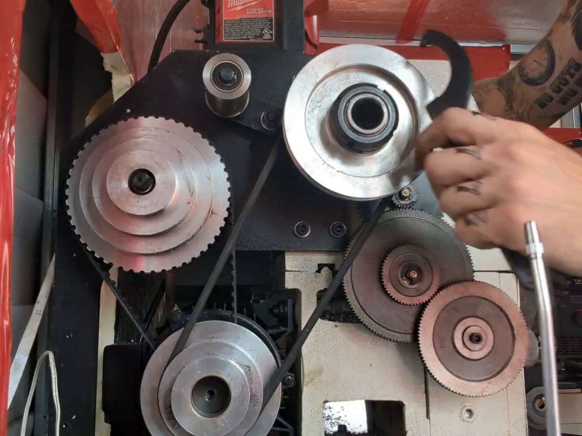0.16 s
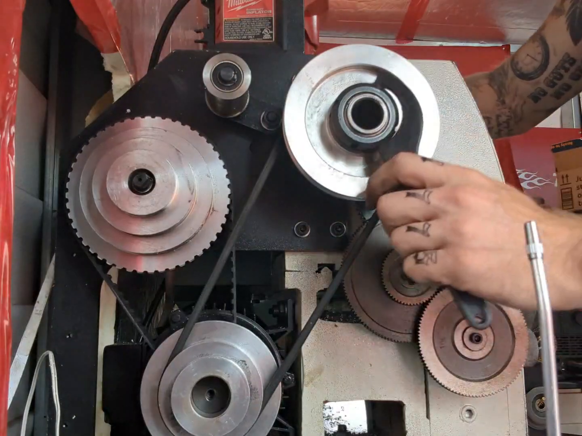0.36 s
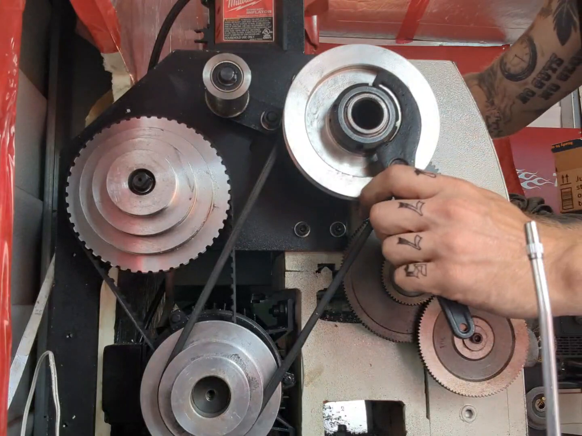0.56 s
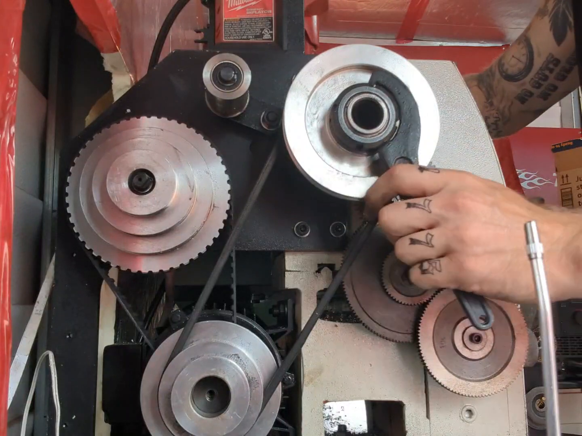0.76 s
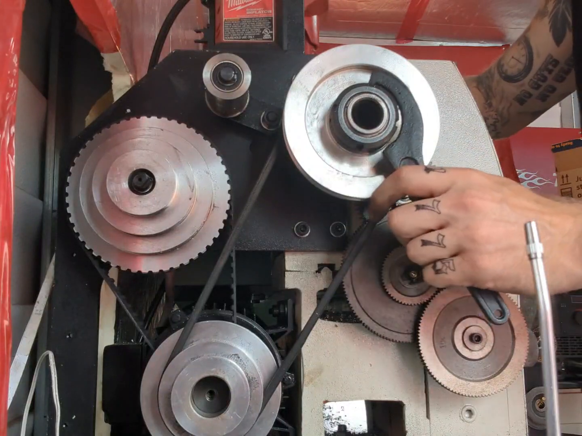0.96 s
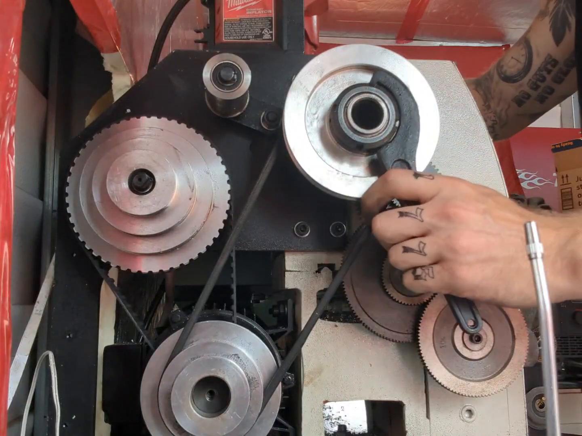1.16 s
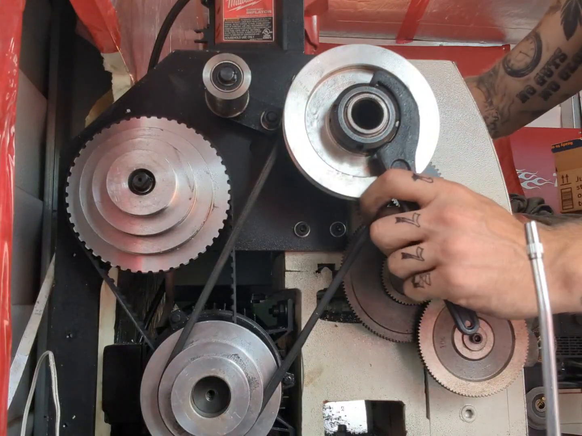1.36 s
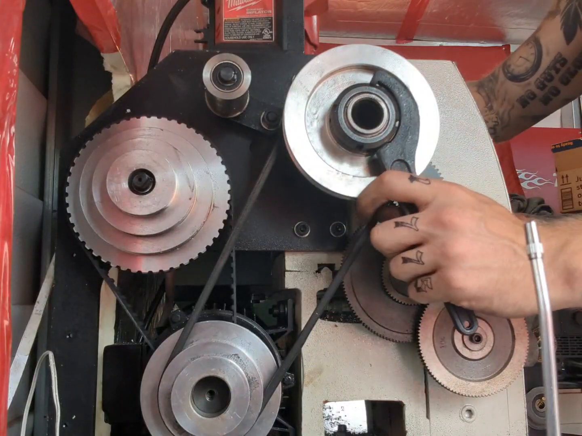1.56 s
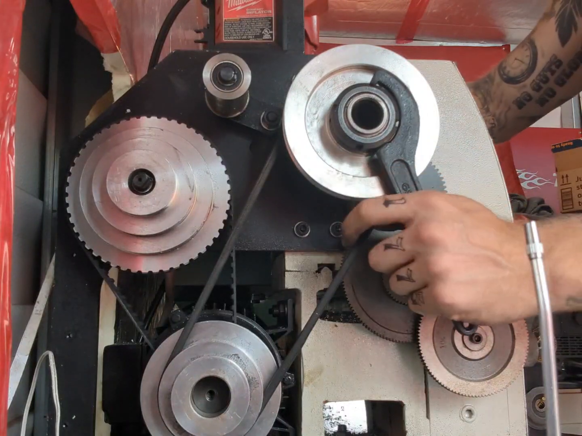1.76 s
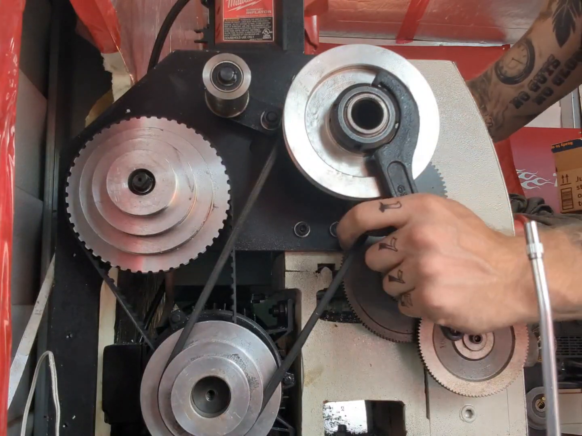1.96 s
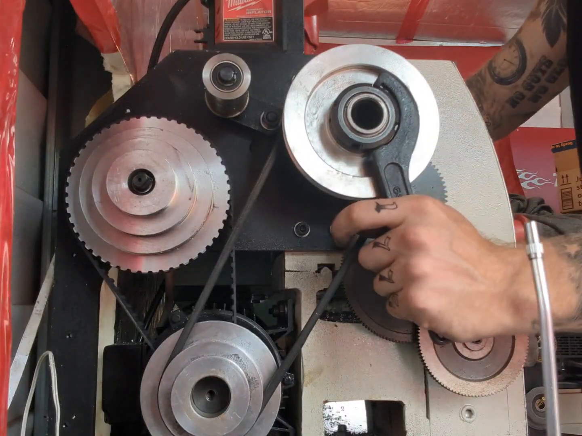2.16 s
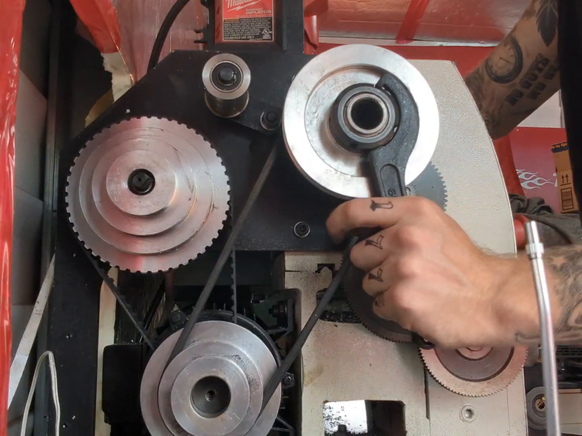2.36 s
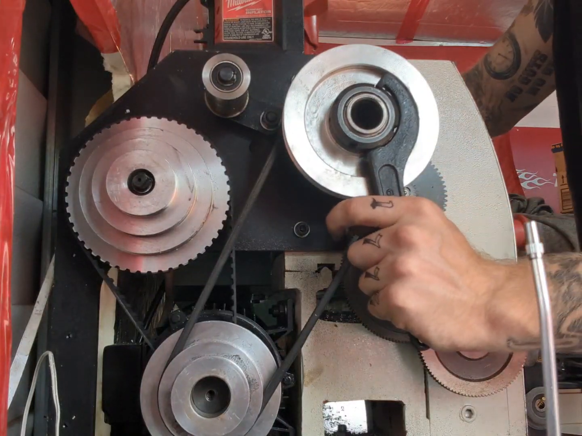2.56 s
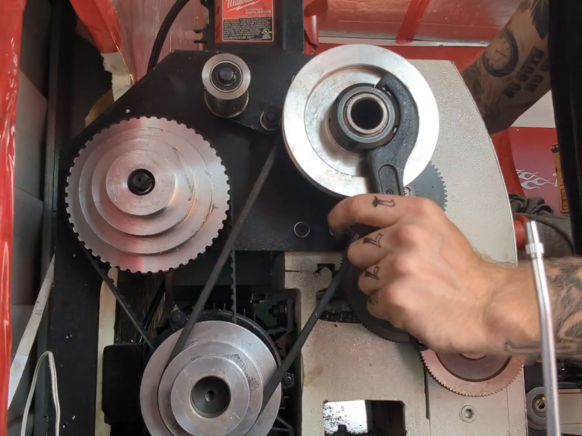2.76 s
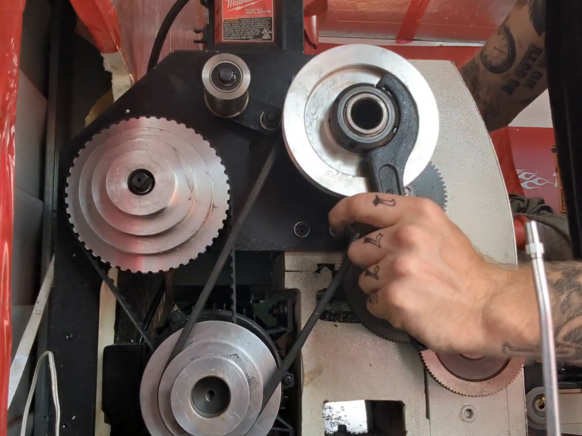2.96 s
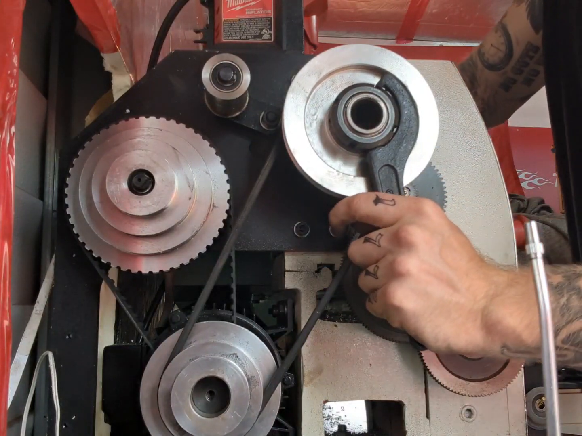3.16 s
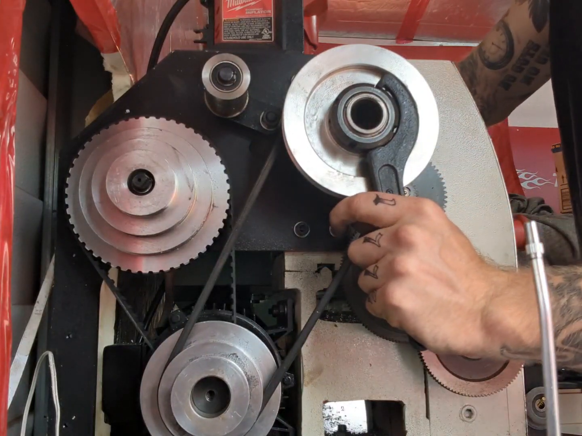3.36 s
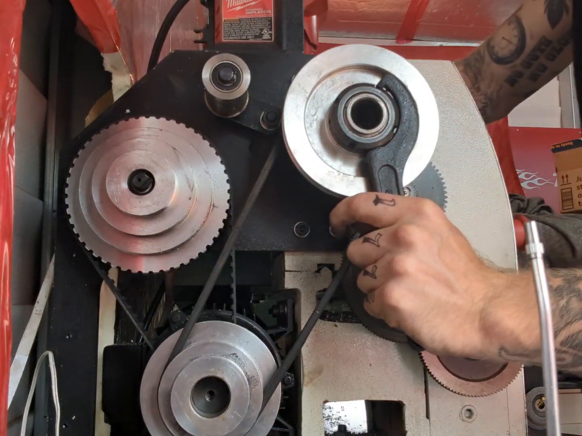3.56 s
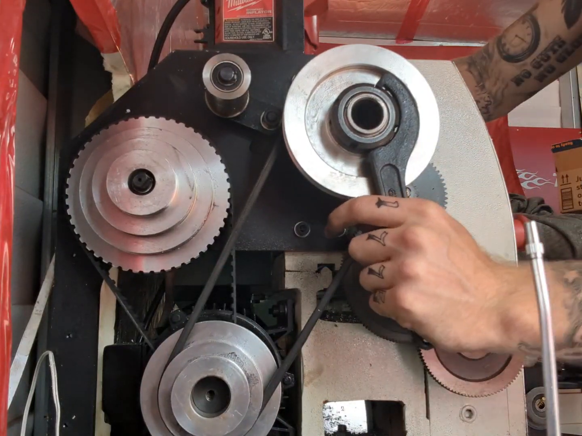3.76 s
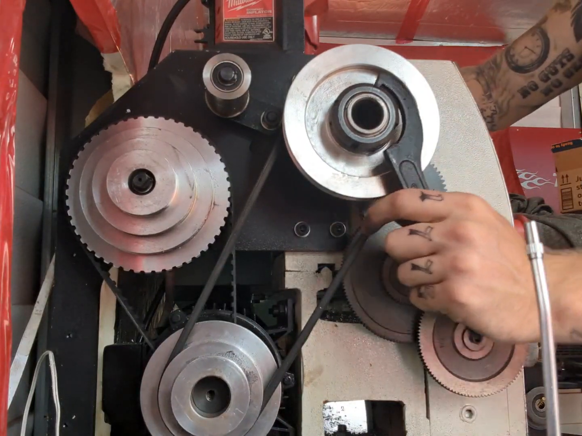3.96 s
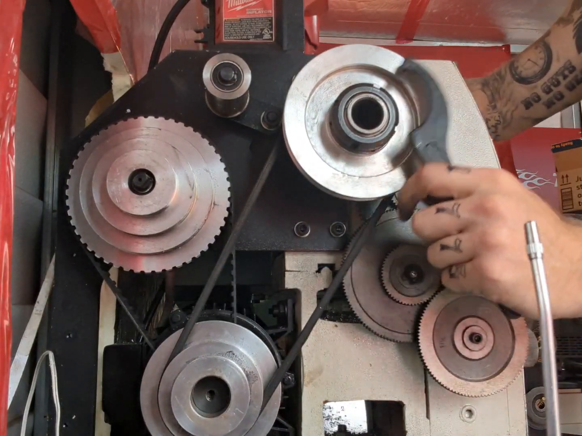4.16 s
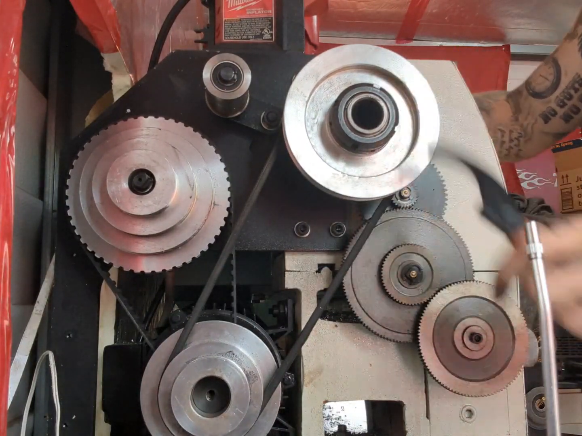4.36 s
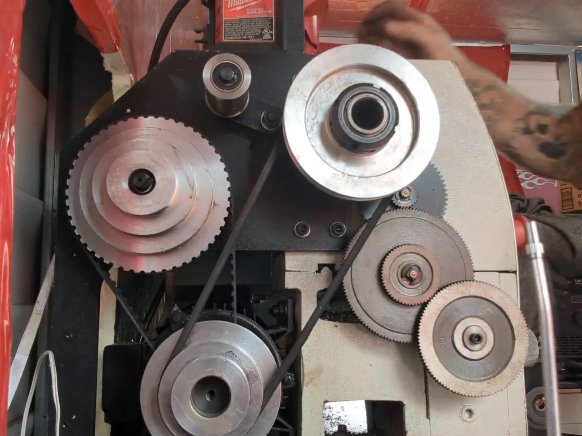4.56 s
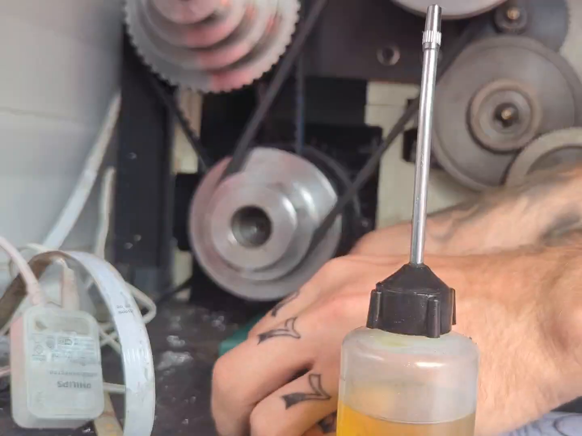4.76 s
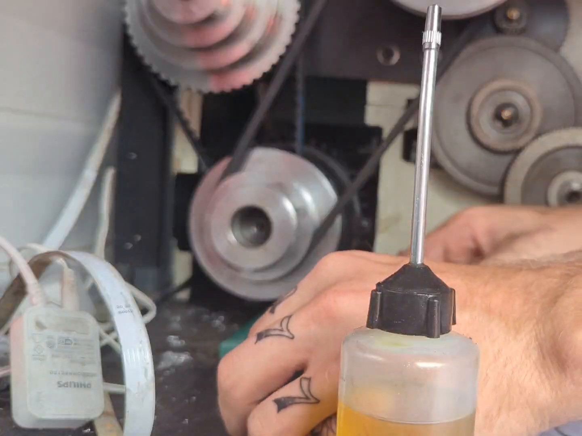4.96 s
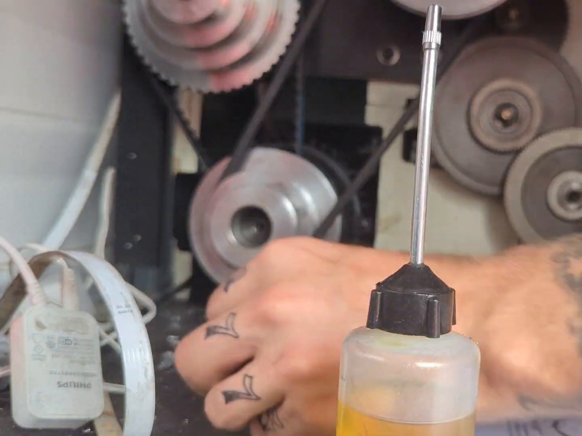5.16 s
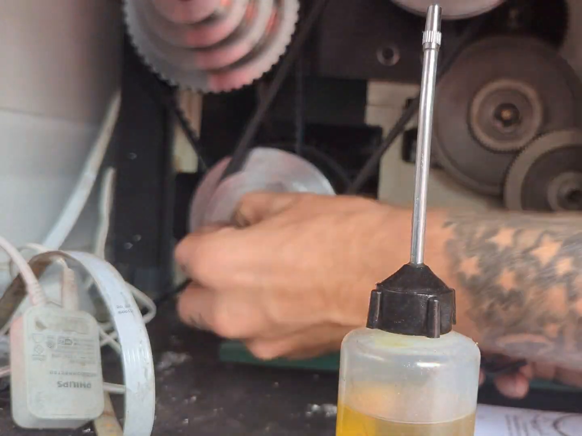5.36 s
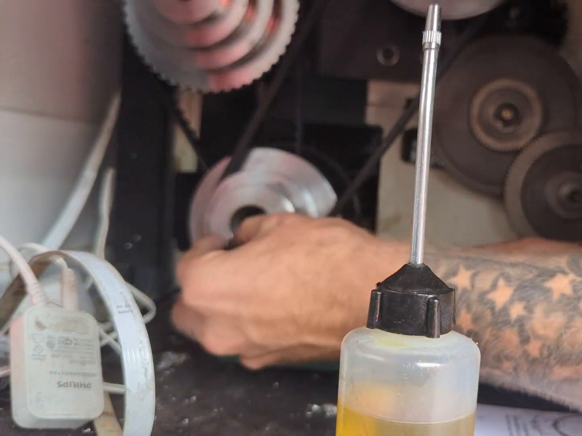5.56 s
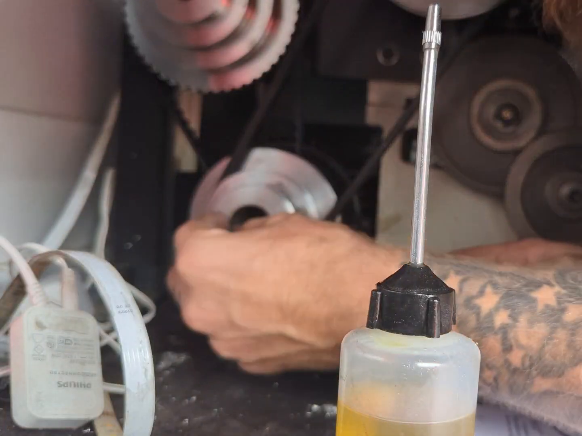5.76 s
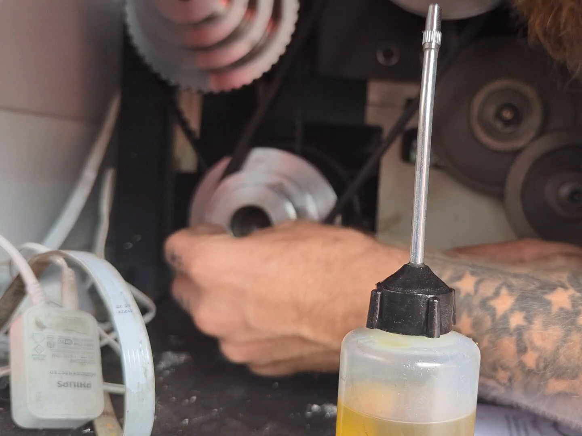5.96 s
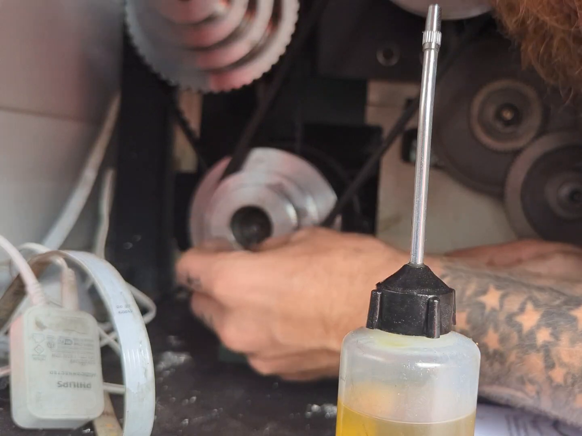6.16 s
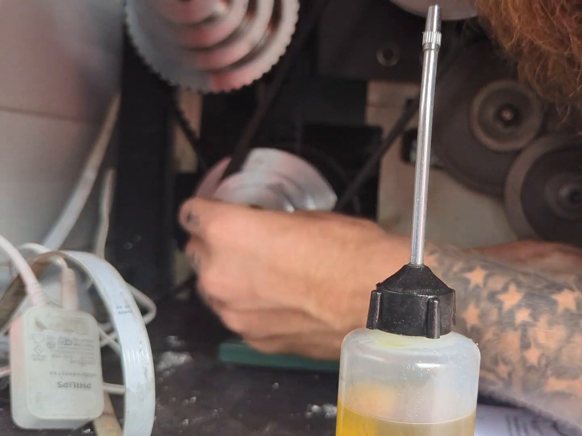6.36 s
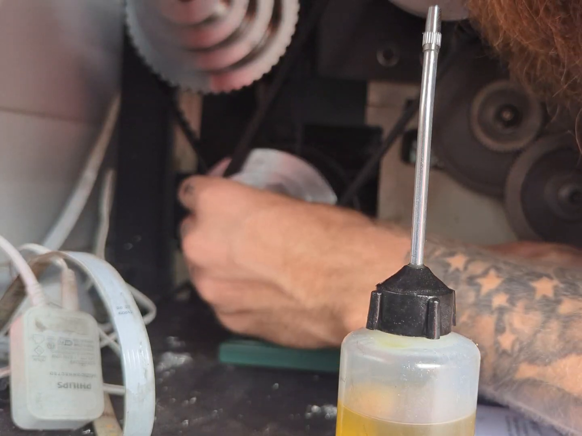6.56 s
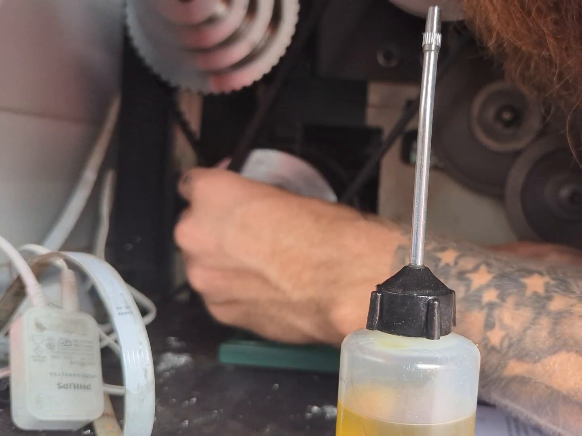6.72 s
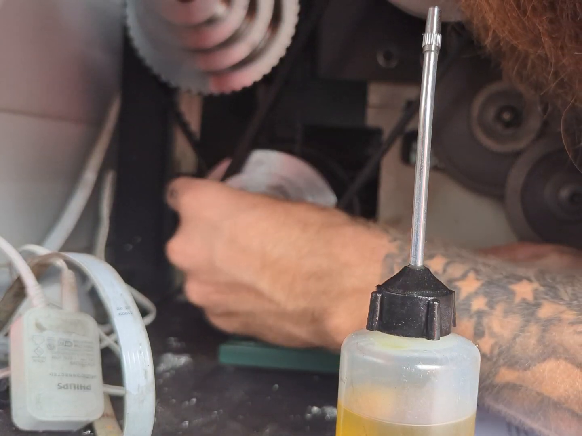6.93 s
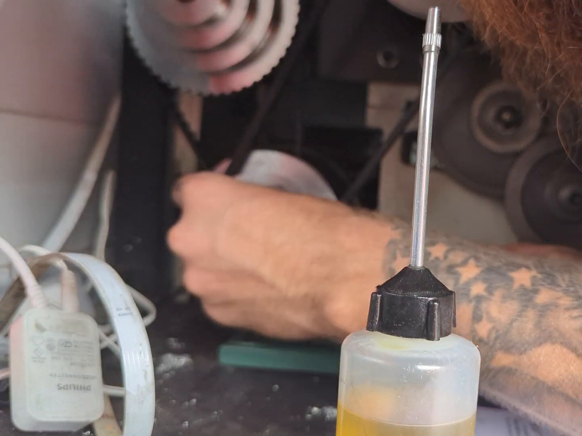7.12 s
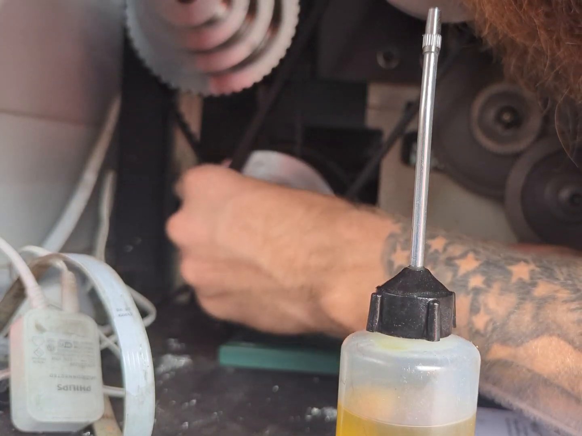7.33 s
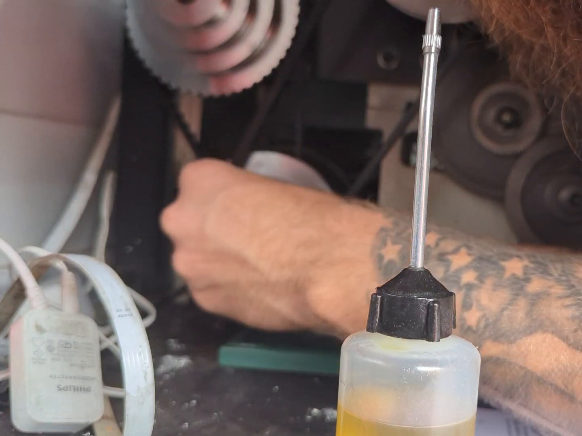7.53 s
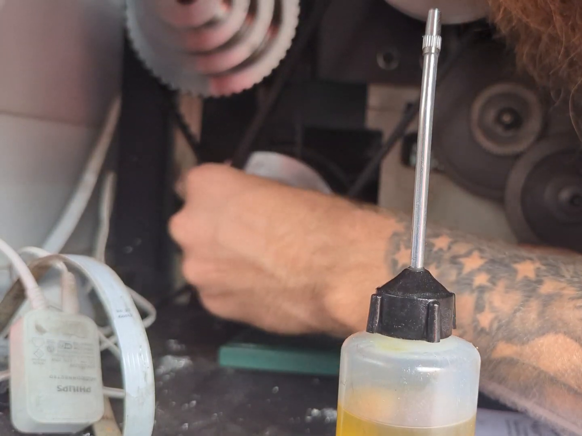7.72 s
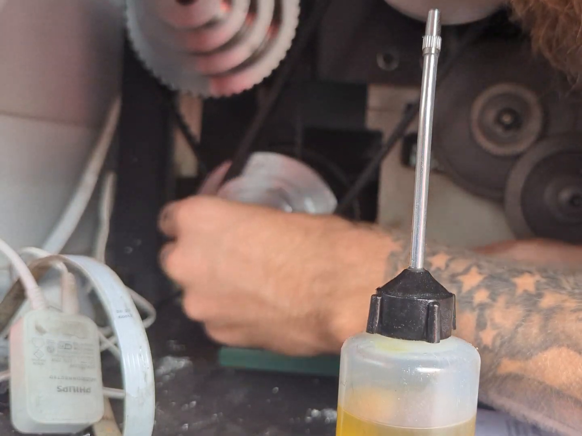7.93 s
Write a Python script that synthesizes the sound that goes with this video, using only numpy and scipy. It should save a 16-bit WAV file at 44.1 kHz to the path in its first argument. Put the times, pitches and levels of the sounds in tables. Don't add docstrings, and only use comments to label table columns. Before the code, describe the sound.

Spanner clatter on iron, piercing brake whistles over traffic rumble, a few lifting knocks, then a hard microphone blow and quiet fiddling with parts.

```python
import sys
import numpy as np
from scipy import signal
from scipy.io import wavfile
from scipy.ndimage import uniform_filter1d

SR = 44100
rng = np.random.default_rng(int(sys.argv[2]) if len(sys.argv) > 2 else 0)


def attenuation_scalar(level_db):
    decades = np.asarray(level_db, float) / 20
    return 10 ** decades


def unload_audio(sound):
    columns = np.transpose(np.atleast_2d(sound))
    steps = np.round(np.clip(columns, -1, 1) * 32767)
    wavfile.write(sys.argv[1], SR, steps.astype(np.int16))


N = 352359

# (time [s], level [dB])
TRAFFIC_LEVEL = [(0, -44), (.27, -43), (.6, -50), (.95, -42), (1.2, -50), (1.44, -46.5), (2.07, -51.5),
                 (2.34, -42.5), (2.55, -45.5), (2.67, -38), (2.95, -47.5), (3.6, -47.5), (3.9, -51),
                 (4.76, -53), (5.6, -58), (6.5, -61), (7.2, -58.5), (7.99, -58)]
# (time [s], gain [dB])
WASH_HISS_GAIN = [(0, 3), (1, -0.5), (2.6, 0), (3.4, -3), (4.35, 0.5), (4.8, 1), (5.1, -4.5), (5.45, -3.5),
                  (5.75, -11), (7.99, -10)]
# (frequency [Hz], level [dB per Hz])
RUMBLE_COLOUR = [(19, -42), (32, -17), (47, -3), (76, 8), (92, 0.5), (113, -9.5), (260, -36.5), (340, -52),
                 (570, -120)]
WASH_COLOUR = [(90, -29), (140, -4.5), (205, -11), (300, -9.5), (700, -17), (860, -22), (980, -18),
               (1570, -24.5), (1870, -22), (2060, -25), (2300, -24), (2700, -28.5), (3600, -29.5),
               (3900, -49)]
HISS_COLOUR = [(2500, -30), (3600, -1), (6500, -3), (8000, -3), (12600, -5), (15600, -5), (15900, -40)]
# (frequency [Hz], level [dB])
HUM_TONES = [(1825, -93.5), (2239, -87.5)]
# (frequency [Hz], likeness [0 to 1])
LIKENESS = [(60, 1), (180, 1), (550, .6), (1650, 0.6), (4970, 0.14), (15000, 0.29)]

# (time [s], level [dB], bass level [dB], treble level [dB], time to fall 60 dB [s])
SLIDES = [(0.0973, -55, -65, -63, 0.1), (0.8258, -29, -33, -31, 0.34), (2.3316, -56.5, -56, -65, 1),
          (2.5358, -45, -72, -51, 0.1), (2.6319, -51, -46, -50, 0.24), (3.1624, -54.5, -59.5, -53, 0.32),
          (3.4336, -40.5, -41.5, -40.5, 0.26), (4.2603, -63, -60, -57, 0.09),
          (4.8027, -31.5, -43, -39, 0.14), (4.975, -49, -46, -62, 0.21), (5.188, -44, -44, -48, 0.093),
          (5.235, -63, -66, -61, 0.35), (5.298, -60, -62, -49, 0.17), (5.362, -51, -50, -49.5, 0.12),
          (5.47, -56.5, -61, -69, 0.54), (6.111, -46.5, -51, -58, 0.17), (6.1292, -49.5, -60, -49.5, 0.089),
          (7.0045, -58.5, -62.5, -61.5, 0.1), (7.185, -59, -59, -82, 0.26), (7.2173, -59, -75.5, -82, 0.18),
          (7.8565, -60.5, -63.5, -75.5, 0.15)]
# (time [s], level [dB], pitch of the part [Hz], bass level [dB], treble level [dB])
SPINDLE_TICKS = [
    (0.3944, -66, 1240, -48, -77),
    (1.84, -72, 5950, -76, -62),
    (2.497, -56, 3150, -69, -60),
    (3.4165, -61, 7440, -58, -55),
    (3.7861, -60, 2500, -69, -64),
    (4.249, -62, 3300, -70, -65),
    (3.8987, -72, 910, -77, -70.5),
    (4.0594, -68, 927, -71, -58),
    (4.149, -72, 1000, -72, -59.5),
]
# (time [s], level [dB],
# pitch of the part [Hz], bass level [dB], treble level [dB])
SHORT_KNOCKS = [(3.948, -49, 1450, -70, -57), (3.9913, -46, 1450, -70, -44.5),
                (4.7803, -44, 1070, -33, -73), (4.807, -31, 1720, -50, -31.5),
                (4.815, -30, 1970, -44, -42), (4.8682, -43.5, 1080, -34.5, -70),
                (5.0355, -62, 5500, -43.5, -42.5), (5.1329, -73.5, 980, -40.5, -94),
                (5.1652, -47, 1010, -41, -61), (5.1835, -50, 900, -46, -59),
                (5.194, -40.5, 1030, -44, -60), (5.2823, -40, 2980, -46, -57),
                (5.6527, -59, 1100, -63.5, -84.5), (6.2081, -60, 3070, -63.5, -77),
                (6.2406, -57.5, 3150, -60, -89), (6.4898, -76, 2234, -76, -83),
                (6.6372, -61, 1870, -69.5, -85.5), (6.782, -53, 1837, -59.5, -78),
                (6.985, -56, 1740, -65, -58), (6.989, -70, 1100, -66, -45), (7.006, -57, 6500, -65, -56),
                (7.5467, -49, 1400, -70, -52)]
# (frequency [Hz], width [Hz], level [dB])
ANSWERING_PARTS = [(1500, 300, -1.5), (1746, 270, 1), (2120, 370, 1), (2720, 180, -13), (3150, 200, -6)]
# (time [s],
# level [dB], pitch [Hz])
FINGER_BUMPS = [(5.616, -61, 611), (5.689, -64.5, 674), (5.779, -65, 665), (5.881, -75, 692),
                (5.979, -67, 630), (6.1, -63.5, 730), (6.235, -70, 660), (6.321, -83, 635),
                (6.496, -77, 546), (6.785, -73.5, 722), (6.99, -60, 696), (7.172, -63, 710),
                (7.549, -64, 750), (7.666, -69, 704), (7.796, -68.5, 732), (7.865, -69, 590),
                (1.2, -46.5, 298), (3.44, -53.5, 360), (4.0, -50.5, 282), (4.15, -56.5, 240),
                (4.25, -53, 220), (7.0, -54.5, 202), (7.56, -58.5, 296), (7.869, -60, 327), (6.5, -66, 300)]

# (time at full
# voice [s], hold [s], level [dB], pitch [Hz], time to fall 60 dB [s])
BRAKE_SQUEALS = [(0.151, 0.013, -67.5, 8580, .4), (0.634, 0.025, -50.5, 8620, 0.052),
                 (0.687, .002, -57, 8580, 0.14), (0.735, 0.075, -62.5, 6526, .03),
                 (0.805, 0.012, -69, 8600, .05), (1.005, .02, -66, 8620, .3),
                 (1.235, 0.067, -48.5, 8624, 0.12), (1.342, .002, -66, 8580, 0.56),
                 (1.613, 0.027, -35, 8510, 0.047), (1.626, .002, -56.5, 7570, .08),
                 (1.678, 0.051, -36.5, 8500, 0.35), (1.785, 0.081, -38, 8480, 0.2),
                 (1.895, 0.085, -34.5, 8464, 0.13), (1.988, 0.078, -47, 8460, 0.11),
                 (2.111, 0.023, -56, 8460, 0.11), (2.191, 0.48, -80.5, 8440, .1),
                 (3.607, 0.044, -78.5, 3530, .06), (4.279, 0.073, -73, 3490, .2),
                 (6.128, 0.01, -62, 5560, 0.091), (0.837, 0.065, -53, 2000, .05),
                 (4.277, 0.065, -77, 2610, .1), (4.319, 0.091, -61.5, 288.3, 0.11),
                 (4.35, 0.3, -68, 440, .1)]
# (time [s], pitch [Hz], level [dB])
ENGINE_NOTE = [(0.7, 76, -70), (0.87, 71, -50), (1.36, 65.43, -46.5), (2.32, 60.9, -46),
               (2.69, 62.8, -54.5), (3.07, 59.57, -51.5), (3.3, 60.74, -57.5), (3.5, 55.3, -47.5),
               (3.8, 56.4, -41)]

# (time [s], casting knock [dB], steel ring [dB], crack [dB], ring time to fall 60 dB [s])
FREE_CONTACTS = [
    (0.499, -18.5, -25, -30, 0.19),
    (0.503, -26, -26, -29, 0.22),
    (0.522, -23, -34.5, -36, 0.19),
    (0.544, -29, -33.5, -33.5, 0.097),
    (0.572, -24.5, -29, -47.5, 0.078),
    (0.592, -29, -46, -58, 0.26),
    (0.662, -27, -56, -46, 0.092),
    (0.697, -29, -43.5, -55, 0.054),
]
# (favoured pitch [Hz], fall on either side [dB per octave])
FREE_FAVOURED = [(4700, 3), (3600, 3), (5000, 8.5), (7810, 12), (4560, 7.5), (5500, 4.5), (3700, 22),
                 (4150, 12)]
# (time [s], casting knock [dB], steel ring [dB], crack [dB])
HELD_CONTACTS = [
    (0.899, -26, -46, -28.5),
    (0.929, -29.5, -63, -43),
    (0.984, -32, -68.5, -52),
    (1.088, -39.5, -80, -82),
    (1.19, -33, -66, -42.5),
    (3.856, -55.5, -83, -64.5),
    (3.951, -31, -58.5, -42),
    (3.994, -30, -62, -40),
    (4.031, -44, -96, -74),
    (4.262, -45, -82, -63),
]
STEEL_MODES_HZ = [2266, 3009, 3630, 4735, 5400, 6002, 6745, 7318, 8590, 9615, 11765, 12350, 13465]
# (level [dB], share of the ring time)
STEEL_VOICE = [(-3.5, 1.1), (-12.5, 0.26), (-7.5, 1.11), (0, 0.75), (-16, 0.67), (-10, 0.97), (-7, 1.1),
               (-10.5, 2.1), (-8.5, 0.83), (-15.5, 0.23), (-14, 0.496), (-19, .6), (-14.5, 1)]
CASTING_MODES_HZ = [215, 281, 355, 441, 580, 628, 682, 792, 878, 925, 1000, 1063, 1185, 1300, 1367, 1520,
                    1700, 1980]
# (level [dB], time to fall 60 dB [s])
CASTING_VOICE = [(-17.5, 0.16), (-32.5, 0.13), (-13, 0.12), (-19, 0.15), (-15.5, 0.099), (-10, 0.17),
                 (-11.5, 0.26), (-10.5, 0.24), (-5.5, .11), (-3.5, 0.14), (1, 0.037), (-11, 0.3),
                 (-7, 0.08), (-14, 0.16), (-9, 0.099), (-11, 0.059), (-14.5, 0.078), (-23.5, 0.055)]

# (time [s], level [dB], frequency [Hz], time to fall 60 dB [s])
SINGLE_PINGS = [(0.499, -25, 4760, 0.1), (0.499, -27, 2240, .12), (4.975, -50, 1800, 0.093),
                (4.99, -50, 1860, 0.085), (5.005, -53, 1790, 0.062), (5.283, -52, 1500, .02),
                (3.992, -47, 5300, 0.022), (3.992, -52, 6700, .015), (3.948, -40, 1380, 0.023),
                (3.991, -41, 1400, .025), (3.998, -40, 900, 0.037), (1.188, -37, 1450, .03),
                (1.19, -42.5, 1295, 0.13), (1.192, -52, 2500, 0.064), (1.188, -53, 3750, .02),
                (6.985, -57, 1735, .06), (6.985, -59, 3140, .04), (6.989, -59, 5814, 0.056),
                (6.989, -60, 6600, .03), (6.989, -62, 10400, .03), (7.006, -60, 1703, .03),
                (7.547, -46, 1344, .035), (7.547, -53, 1525, .06), (7.547, -53, 2330, .06),
                (5.1335, -45, 745, .03), (5.184, -33, 860, .035), (5.194, -33, 900, .025),
                (5.199, -34, 1080, .035), (5.282, -44, 422, .018), (4.815, -46.5, 4600, .02),
                (4.816, -30.5, 2100, 0.039), (4.803, -46, 4440, 0.016), (0.899, -52, 4800, .05),
                (1.189, -57, 4830, 0.053), (3.439, -46, 7720, .08), (3.46, -56, 1590, 0.19),
                (4.8065, -36, 4620, .016), (4.8065, -35, 3060, .016), (5.035, -41, 740, 0.031),
                (5.035, -44, 4500, 0.029), (5.035, -44, 5700, .03), (5.035, -52, 8110, .03),
                (5.236, -60, 5600, .03), (5.236, -66, 8200, .03), (5.283, -56, 3040, .03),
                (6.782, -62, 3030, 0.044), (7.547, -48.5, 3170, 0.047), (7.547, -50, 1750, 0.039),
                (7.86, -68, 2450, .08),
                (.57, -30, 3638, .08), (.57, -37, 2263, .04), (.571, -38, 4742, .07),
                  (.57, -42, 7316, .08), (.543, -38, 6749, .06), (.499, -34, 3638, .07),
                  (.522, -30, 580, .09), (.499, -28, 600, .09), (.898, -42, 3400, .025),
                  (.898, -40, 2500, .025), (.898, -48, 6100, .03), (.662, -50, 3638, .09),
                  (3.991, -47, 3625, .1), (3.949, -48, 2450, .06), (3.992, -46, 1800, .05),
                  (3.992, -52, 2800, .06), (7.547, -54, 2690, .03), (5.282, -47, 3300, .013),
                  (5.282, -50, 1400, .013), (.898, -38, 1900, .02), (1.188, -48, 2900, .025),
                  (6.2, -70, 5550, .06), (3.952, -42, 600, .08)]
# (time [s], level [dB], after-swing level [dB])
BLOW = [
    (4.7644, .2, -5.7),
    (4.76422, -.9, -12),
]
# (frequency [Hz], level [dB], time to fall 60 dB [s])
CLACK_MODES = [(651, -5, .1), (791, -3, .07), (1039, -1, .09), (1265, -7, .13), (1560, -8, .05),
               (1432, -13, .1), (1750, -4, .06), (1950, -8, .05), (2148, -8, .08), (2514, -17, .1),
               (3000, -18, .06)]
# (time [s], sliding pitch [Hz], pressure [dB])
DRAG_PATH = [(5.22, 1090, -89), (5.32, 1600, -64), (5.338, 1680, -51), (5.383, 1640, -51),
             (5.395, 1380, -49), (5.47, 1250, -56.5), (5.52, 1096, -64), (5.57, 1127, -77),
             (5.68, 1160, -91)]
TRAY_MODES_HZ = np.array([1130, 1370, 1650])
# (frequency [Hz], time to fall 60 dB [s])
SHOP_DECAY = [(200, .25), (1000, 0.27), (3000, 0.1), (12000, 0.05)]


def evened(x):
    return x / np.sqrt(np.mean(x ** 2) + 1e-20)


def read(points, hz):
    f, value = np.transpose(points)
    return np.interp(np.log(hz + 1), np.log(f + 1), value)


def add(mix, s, sound):
    part = mix[..., round(s * SR):][..., :sound.shape[-1]]
    part += sound[..., :part.shape[-1]]


def columns(rows):
    s, *rest = np.transpose(rows)
    t = np.arange(s[0], s[-1], 1 / SR)
    return s[0], [np.interp(t, s, c) for c in rest]


def resonate(x, hz, width_hz):
    turn = np.exp(2j * np.pi * np.cumsum(hz * np.ones(x.shape[-1])) / SR)
    r = np.exp(-np.pi * width_hz / SR)
    return 2 * (turn * signal.lfilter([1 - r], [1, -r], x / turn + 1e-18)).real


def band(x, lo_hz, hi_hz, order=3):
    sos = signal.butter(order, [lo_hz, min(hi_hz, SR / 2.2)], "band", fs=SR, output="sos")
    return evened(signal.sosfilt(sos, x))


def grain(size, depth_db):
    flicker = uniform_filter1d(uniform_filter1d(rng.standard_normal(size), size=70), size=50)
    return evened(attenuation_scalar(depth_db * evened(flicker)))


def ring(modes, t, scatter_db, turns, beat=0):
    hz, db, t60 = np.transpose(modes)[:, :, None]
    luck, apart = rng.standard_normal((2, len(modes), 1))
    sides = np.array([-.5, .5])[:, None, None]
    phase = rng.random(luck.shape) + turns * apart * sides
    beating = 1 + beat * np.cos(2 * np.pi * (45.4 * apart * t + 7 * phase[0]))
    x = attenuation_scalar(db + scatter_db * luck - 60 * t / t60) * beating * np.sin(2 * np.pi * (hz * t + phase))
    return x.sum(1) / np.sqrt(np.sum(attenuation_scalar(db) ** 2))


def from_right(x):
    return np.array([np.roll(x[0], 18), x[1]])


def background():
    frames, hz = N // 512 + 5, np.fft.rfftfreq(2048, 1 / SR)
    a, b, c, d, patches = rng.standard_normal((frames, 1025, 5)).T
    patches = evened(uniform_filter1d(uniform_filter1d(patches, size=20, axis=0), size=6, axis=1))
    same = np.clip(read(LIKENESS, hz), .3, 1)[:, None]
    left = a + 1j * b
    right = same * left + np.sqrt(1 - same ** 2) * (c + 1j * d)
    z = np.array([left, right]) * attenuation_scalar(1.2 * patches)
    t = np.arange(N) / SR
    gain_db = np.interp(t, *np.transpose(WASH_HISS_GAIN))
    traffic_db = np.interp(t, *np.transpose(TRAFFIC_LEVEL))
    out = sum(attenuation_scalar(db) * np.sqrt(2) * np.sin(2 * np.pi * f * t) for f, db in HUM_TONES) * np.ones((2, 1))
    layers = [(RUMBLE_COLOUR, traffic_db, from_right), (WASH_COLOUR, -59 + gain_db, from_right),
              (HISS_COLOUR, -75 + 1.4 * gain_db, np.array)]
    for colour, db, place in layers:
        layer = signal.istft(z * attenuation_scalar(read(colour, hz))[:, None], nperseg=2048, noverlap=1536)[1][:, :N]
        out = out + place(evened(layer)) * attenuation_scalar(db)
    return out


def handling(rows, rise_s, snap, ring_db, grain_db, edge_hz, top_hz):
    out, t = np.zeros((2, N)), np.arange(SR // 3) / SR
    for s, db, hz, bass_db, treble_db, t60 in rows:
        z = rng.standard_normal((3, len(t)))
        z = (z[0] + 1.4 * z[1:]) * grain(len(t), grain_db)
        parts = evened(sum(attenuation_scalar(p_db) * resonate(resonate(z, f, w), f, w) / np.sqrt(w)
                           for f, w, p_db in ANSWERING_PARTS))
        burst = attenuation_scalar(db - 2.5) * (parts + .88 * band(z, 1000, 3500, order=4))
        burst += attenuation_scalar(treble_db - 20 * t / t60) * band(z, edge_hz, top_hz, order=2)
        burst *= 1 + snap * np.exp(-t / 0.0037)
        burst += attenuation_scalar(bass_db + 12 * t / t60) * band(z, 610, 1500)
        own_db = bass_db if hz < 1300 else db if hz < 4000 else treble_db
        burst += attenuation_scalar(own_db + ring_db - 15 * t / t60) * evened(resonate(resonate(z, hz, 260), hz, 260))
        rise = np.sin(np.pi / 2 * np.minimum(t / rise_s, 1)) ** 2
        add(out, s - rise_s / 2, burst * attenuation_scalar(-7 - 60 * t / t60) * rise)
    return out


def squeal(s, hold, db, hz, t60):
    t = np.arange(-.06, hold + t60, 1 / SR)
    z = rng.standard_normal((2, SR))
    drift = evened(uniform_filter1d(z[0], size=3000))[:len(t)]
    hz = hz - 140 * t
    fuzz = evened(resonate(resonate(z[1, :len(t)], hz, 400), hz, 400))
    tone = np.sqrt(2) * np.sin(2 * np.pi * np.cumsum(hz) / SR + np.outer([1, 0], drift)) + 0.002 * fuzz
    shape_db = 895.5 * np.minimum(t, 0) - 60 * np.maximum(t - hold, 0) / t60
    return s + t[0], attenuation_scalar(db + shape_db) * tone * attenuation_scalar([[-5], [3]])


def vehicle():
    out, note = np.zeros((2, N)), np.zeros((2, N))
    for row in BRAKE_SQUEALS:
        add(out, *squeal(*row))
    s, (hz, db) = columns(ENGINE_NOTE)
    tone = np.sqrt(2) * np.sin(2 * np.pi * np.cumsum(hz) / SR)
    add(note, s, attenuation_scalar(db) * tone * signal.windows.tukey(len(hz), .1))
    return out + from_right(note)


def spanner():
    out, t = np.zeros((2, N)), np.arange(SR // 3) / SR
    long = np.arange(SR // 2) / SR
    casting = [(hz, *row) for hz, row in zip(CASTING_MODES_HZ, CASTING_VOICE)]
    contacts = [(*row, *spot) for row, spot in zip(FREE_CONTACTS, FREE_FAVOURED)]
    # ring time 0.12 s, only modes near the jaw's 3630 Hz
    contacts += [(*row, 0.12, 3630, 38) for row in HELD_CONTACTS]
    next_times = [row[0] for row in contacts[1:]] + [N]
    for (s, knock_db, ring_db, crack_db, t60, spot_hz, narrow_db), later in zip(contacts, next_times):
        knock = ring(casting, t, 1.6, .22, beat=.5) * (.7 + 1.2 * np.exp(-t / .012))
        knock *= np.minimum(t / .003, 1) * grain(len(t), 3.2)
        steel = [(hz, db - narrow_db * abs(np.log2(hz / spot_hz)), share * t60)
                 for hz, (db, share) in zip(STEEL_MODES_HZ, STEEL_VOICE)]
        steel = ring(steel, t, 1.2, .15, beat=.3) * grain(len(t), 1.5)
        z = rng.standard_normal((3, len(t)))
        z = (z[0] + 1.4 * z[1:]) * grain(len(t), 2.2)
        grit = attenuation_scalar(-3 - .27 * narrow_db - 60 * t / .089) * band(z, 2400, 7200, order=2)
        grit *= np.minimum(t / 0.0037, 1)
        stifle = attenuation_scalar(-60 * np.maximum(t - (later - s), 0) / 0.017) * np.minimum(t / 0.00031, 1)
        crack = band(z, 1150, 2400, order=2) * (attenuation_scalar(-60 * t / 0.057) + attenuation_scalar(-60 * t / 0.0027))
        crack += attenuation_scalar(-11 - 60 * t / 0.022) * band(z, 2500, 4400, order=2)
        cover = attenuation_scalar(knock_db - 26 - 60 * long / .74) * np.sin(2 * np.pi * 997 * long) * (1 - 2 * long)
        add(out, s, cover)
        clink = attenuation_scalar(knock_db) * knock + attenuation_scalar(ring_db + 3.5) * (steel + grit) * stifle + attenuation_scalar(crack_db) * crack
        add(out, s - .002, clink)
    return out


def pings():
    out, t = np.zeros((2, N)), np.arange(SR // 5) / SR
    for s, db, hz, t60 in SINGLE_PINGS:
        add(out, s, attenuation_scalar(db) * ring([(hz, 0, t60)], t, 0, .14) * np.minimum(t / .001, 1))
    return out


def bumps():
    out, t = np.zeros((2, N)), np.arange(SR // 8) / SR
    for s, db, hz in FINGER_BUMPS:
        z = rng.standard_normal((3, len(t)))
        hollow = evened(resonate(z[0] + 0.38 * z[1:], hz, 67))
        add(out, s, hollow * attenuation_scalar(db + 1.5 - 60 * t / 0.15) * np.minimum(t / 0.0041, 1))
    return out


def thump():
    s, db, after_db = np.transpose(BLOW)[:, :, None]
    t = np.arange(N) / SR - s
    blow = np.exp(-.5 * ((t - .0003) / .00077) ** 2)
    after = attenuation_scalar(after_db) * np.clip(t / .0012, 0, 1) * np.clip((4.7679 - s - t) / .0004, 0, 1)
    swing = np.cos(2 * np.pi * t * (560 + 24000 * t))
    edge = attenuation_scalar(-38) * band(rng.standard_normal(N), 1400, 4000, order=2)
    edge = edge * np.exp(-.5 * ((t - .0005) / .0015) ** 2)
    return attenuation_scalar(db) * (np.maximum(blow, after) * (swing + 0.021) + edge)


def clack():
    out, t = np.zeros((2, N)), np.arange(SR // 4) / SR
    length_s, tail = .021, .22
    pressed = np.clip((length_s - t) / .004 + 1, 0, 1)
    push = np.minimum(t / .007, 1) ** 2 * (tail + (1 - tail) * pressed)
    held = attenuation_scalar(60 * np.minimum(t, length_s) / .15)
    sound = ring(CLACK_MODES, t, 0, 0.16, beat=.3) * held * push * grain(len(t), 3.5)
    add(out, 4.799, attenuation_scalar(-31.5) * sound / np.sqrt(np.mean(sound[:, :SR // 30] ** 2)))
    return out


def drag():
    out, (s, (hz, tray_db)) = np.zeros((2, N)), columns(DRAG_PATH)
    fade_db = 43 * np.arange(len(hz)) / SR
    rub_db = -61.5 + .1 * (tray_db - tray_db[0]) - fade_db
    z = rng.standard_normal((2, len(hz)))
    z = (z + .5 * z[::-1]) * grain(len(hz), 2.5)
    tray = sum(evened(resonate(resonate(z, f, 250), f, 210)) * np.exp(-((hz - f) / 170) ** 2)
               for f in TRAY_MODES_HZ)
    sound = attenuation_scalar(tray_db - 3.5) * tray + attenuation_scalar(rub_db) * band(z, 640, 3800)
    add(out, s, sound * signal.windows.tukey(len(hz), .2))
    return out


def shop(x):
    taps = np.zeros((2, SR // 2))
    at = np.arange(200, SR // 2 - 20, 20) + rng.integers(0, 20, (2, (SR // 2 - 201) // 20))
    np.put_along_axis(taps, at, rng.choice([-1., 1.], at.shape), 1)
    hz, t, z = signal.stft(taps, SR, nperseg=256)
    tail = signal.istft(z * attenuation_scalar(-60 * t / read(SHOP_DECAY, hz)[:, None]), SR, nperseg=256)[1]
    return signal.fftconvolve(x, tail / np.linalg.norm(tail[0]), axes=1)[:, :N]


def drop_bands(x):
    def part(x, hz):
        return signal.sosfiltfilt(signal.butter(4, hz, "band", fs=SR, output="sos"), x)

    power = uniform_filter1d((part(x, (8200, 8800)) ** 2).mean(0), size=1500)
    for db, hz in ((-55, (10200, 11000)), (-45, (9300, 10300)), (-41, (10900, 11900))):
        loud = uniform_filter1d(1. * (power > attenuation_scalar(2 * db)), size=400)
        x = x - part(x, hz) * loud
    return x


def scene():
    touches = [(*row, 0.13) for row in SPINDLE_TICKS] + [(*row, .04) for row in SHORT_KNOCKS]
    slides = [(s, db, 1912, *rest) for s, db, *rest in SLIDES]
    hands = handling(touches, rise_s=0.00076, snap=0.25, ring_db=-0.75, grain_db=2, edge_hz=5000, top_hz=13000)
    hands += handling(slides, rise_s=.012, snap=0.097, ring_db=-8, grain_db=1.2, edge_hz=2300, top_hz=15000)
    hands += pings() + bumps() + clack() + drag()
    steel = spanner()
    echo = shop(attenuation_scalar(-11) * steel + attenuation_scalar(-12) * hands)
    return background() + vehicle() + steel + hands + echo + thump()


def band_limit(x):
    return signal.sosfilt(signal.butter(12, 16630, fs=SR, output="sos"), x)


def record(dry):
    before, after = (signal.sosfilt(signal.butter(2, hz, "high", fs=SR, output="sos"), dry) for hz in (50, 24))
    mix = drop_bands(np.where(np.arange(N) < 4.72 * SR, before, after))
    low_pass = signal.firwin(255, 15900, window=("kaiser", 6), fs=SR)
    mix = signal.oaconvolve(mix, low_pass[None], "same")
    return band_limit(mix)


dry = scene()
out = record(dry)
unload_audio(out)
```